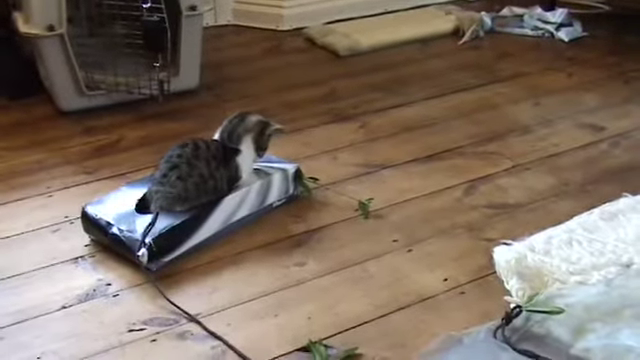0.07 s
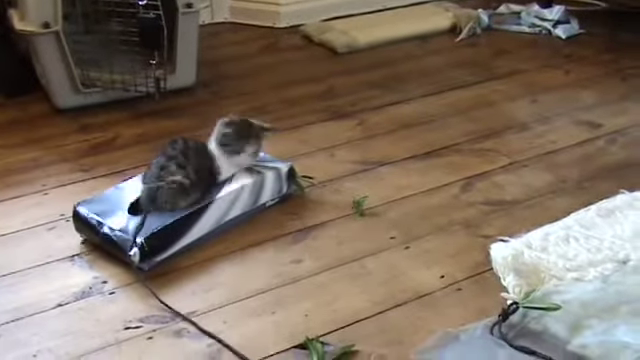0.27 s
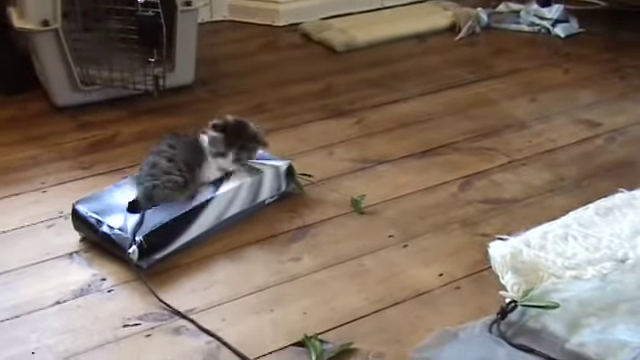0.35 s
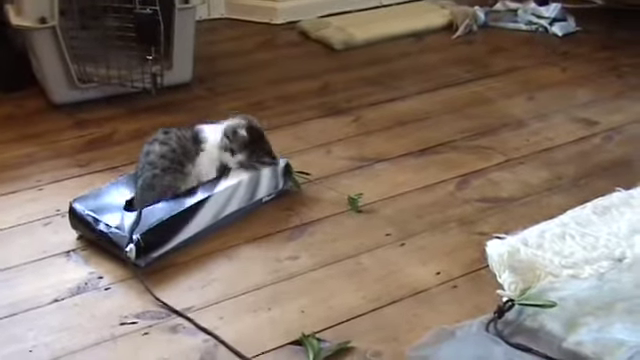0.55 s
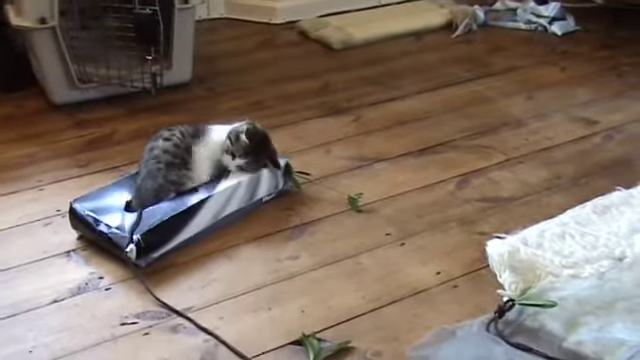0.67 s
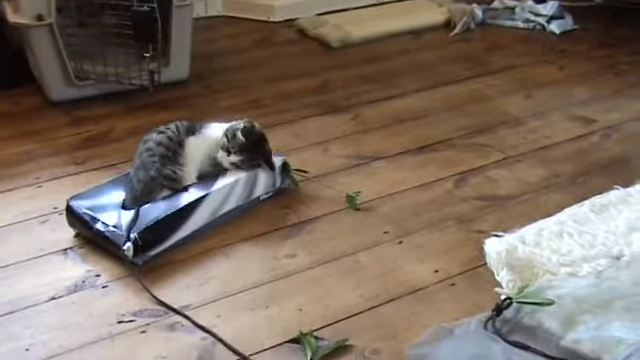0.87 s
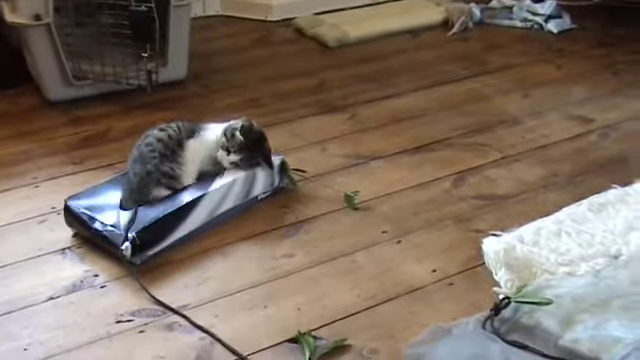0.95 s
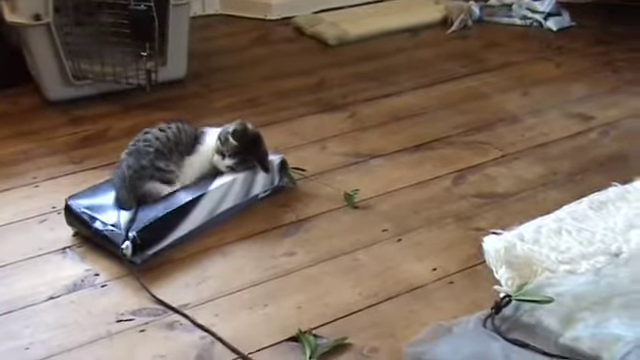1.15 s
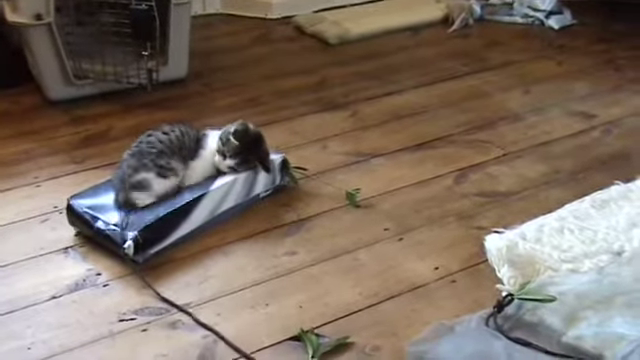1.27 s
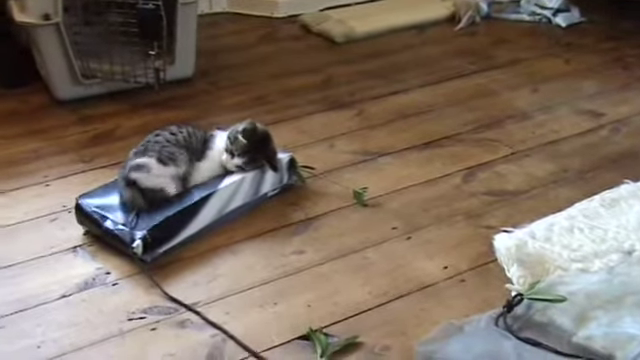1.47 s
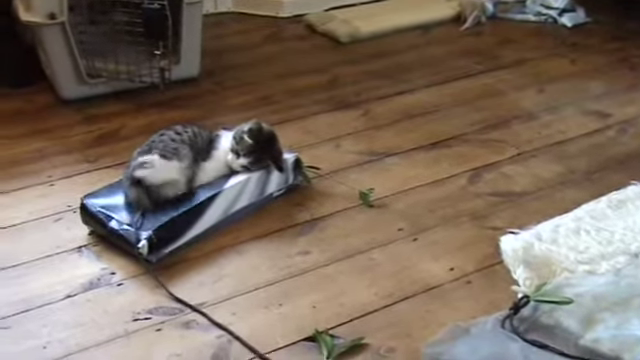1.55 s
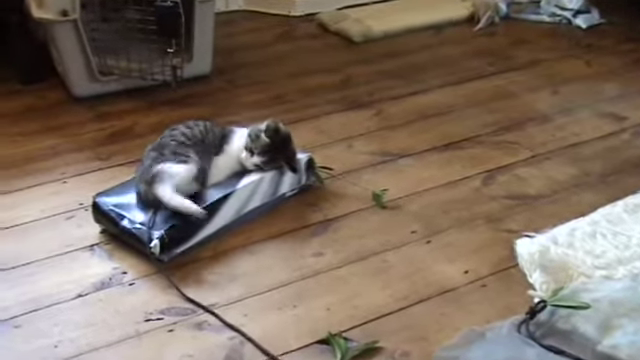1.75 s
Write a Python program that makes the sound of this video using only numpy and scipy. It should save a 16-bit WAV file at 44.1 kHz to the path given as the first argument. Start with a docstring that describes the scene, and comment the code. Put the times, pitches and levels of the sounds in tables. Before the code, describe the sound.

A kitten lands on a wrapped box: a quick hollow thump, paper crackle, then sparse knocks and rustles

```python
"""A kitten pounces on a flat, paper-wrapped box that lies on a wooden floor.
The box thumps and knocks as filtered bursts of dying tones, and booms once after the pounce.
The wrapping rustles as clumps of tiny clicks and snaps as single-cycle clicks, one of them very sharp.
The floorboards give low thuds. A bare, lively room of dense reflections answers the knocks, snaps
and rustle, over a faint steady hush."""
import sys
import numpy as np
from scipy import signal
from scipy.fft import rfft, irfft
from scipy.io import wavfile
from scipy.ndimage import uniform_filter1d

SR = 44100
rng = np.random.default_rng(int(sys.argv[2]) if len(sys.argv) > 2 else 0)


def dump(signal):
    """Clip the signal to [-1, 1] and save it as 16-bit WAV at the path in sys.argv[1]."""
    limited = np.clip(np.atleast_2d(signal).T, -1, 1)
    pcm = np.round(limited * 32767).astype(np.int16)
    wavfile.write(sys.argv[1], SR, pcm)


N = 79380  # samples, 1.8 s


def amp(db):
    """Decibels to gain."""
    return 10 ** (np.asarray(db) / 20)


def unit(x):
    """Scales to rms 1."""
    return x / np.sqrt(np.mean(x ** 2) + 1e-20)


def read(points, hz):
    """Reads a table on a log-frequency axis."""
    f, value = np.transpose(points)
    return np.interp(np.log(hz + 1), np.log(f + 1), value)


def add(mix, s, sound):
    """Mixes a sound in at a time in seconds, cut off at the end of the mix."""
    start = max(round(s * SR), 0)
    part = mix[start:][:len(sound)]
    part += sound[:len(part)]


def colour(x, points):
    """Causal minimum-phase filter that follows a (Hz, dB) table."""
    size = 4096
    hz = abs(np.fft.fftfreq(size, 1 / SR))
    log_gain = np.log(amp(read(points, hz)))
    response = np.exp(np.conj(signal.hilbert(log_gain)))
    taps = np.fft.ifft(response).real[:size // 2]
    return signal.fftconvolve(x, taps)[:len(x)]


def stereo(mid, side):
    """Left and right from middle and side."""
    return np.array([mid + side, mid - side])


def ringing(modes):
    """A second of dying tones, each mode with its own pitch, level and decay."""
    t = np.arange(SR) / SR
    return sum(amp(db - 60 * t / t60) * np.cos(2 * np.pi * hz * t) for hz, db, t60 in modes)


# Steady background. Each row: frequency in Hz, relative level in dB per Hz.
HUSH_COLOUR = [(15, -65), (25, -11.5), (274, -7.5), (340, -7), (895, -14), (1270, -12.5), (1710, -19),
               (2490, -20.5), (5880, -26), (15500, -32)]
HUSH_DB, HUSH_SIDE_DB = -58, 5.5  # rms of the middle; side against middle


def hush():
    """Faint steady noise of the room: coloured noise, independent in middle and side."""
    # a second of run-in lets the filter settle
    mid, side = (unit(colour(rng.standard_normal(N + SR), HUSH_COLOUR)[SR:]) for _ in range(2))
    return amp(HUSH_DB) * stereo(mid, amp(HUSH_SIDE_DB) * side)


# How fast the room dies away. Each row: frequency in Hz, t60 in seconds.
ROOM_DECAY = [(100, .5), (300, 0.05), (650, 0.71), (1300, 0.66), (3000, 0.75), (6000, .5), (12000, 1)]
# Colour of the room's answer. Each row: frequency in Hz, level in dB.
ROOM_COLOUR = [(40, -12), (90, -6), (170, -4.5), (260, 3.5), (400, -1.5), (700, -0.5), (1300, -0.5),
               (2500, -4), (5000, -3), (8000, -8.5), (14000, 0)]
ROOM_GAP_S = .0012  # silence before the first reflection
EARLY_DB, EARLY_S = 5.5, 0.037  # extra strength of the early reflections and its time constant


def room_tail():
    """Dense reflections, strongest at first, each band dying at its own speed."""
    t = np.arange(SR) / SR
    after_gap = t > ROOM_GAP_S
    hz, when, bands = signal.stft(rng.choice([-1., 1.], SR), SR, nperseg=256)
    decay = amp(-60 * when / read(ROOM_DECAY, hz)[:, None])
    tail = signal.istft(bands * decay, SR, nperseg=256)[1][:SR]
    tail *= after_gap * (1 + amp(EARLY_DB) * np.exp(-t / EARLY_S))
    # level the bands, so that the room's colour comes from its table
    spectrum = rfft(tail)
    smooth = np.sqrt(uniform_filter1d(abs(spectrum) ** 2, size=140))
    return colour(irfft(spectrum / smooth) * after_gap, ROOM_COLOUR)


# Faint low tones that ring along with the room's answer.
# Each row: frequency in Hz, level in dB before the send's wet gain, t60 in seconds.
ROOM_RESONANCES = [(149, -70, 0.48), (378, -91, 0.24), (434, -68.5, 0.71), (471, -64, 0.33),
                   (560, -62, 0.24), (917, -76, 0.7), (1286, -64, .55)]
# Stereo width, also used by the rustle. Each row: frequency in Hz, gain of the side signal in dB.
SIDE_WIDTH = [(40, -7), (150, -22), (500, -16.5), (1100, -10.5), (2200, -11), (4500, -7.5), (7500, -4),
              (9500, 3.5), (11000, -14.5), (15000, -35)]


def in_room(x, wet_db):
    """The direct sound in the middle and the room's answer in both channels."""
    mid_tail = room_tail() + ringing(ROOM_RESONANCES)
    side_tail = room_tail()
    mid, side = (amp(wet_db) * signal.fftconvolve(x, tail)[:N] for tail in (mid_tail, side_tail))
    return stereo(x + mid, colour(side, SIDE_WIDTH))


GRAINS_PER_S, GRAIN_SPREAD_DB = 9900, 2  # mean click rate; unevenness of click size
CLUMP_DB, CLUMP_S = 2, 0.007  # how strongly the clumps swing, and for how long


def grains(force, spectrum):
    """Tiny stick-slip clicks of uneven size, clumped band by band, under the force of the strokes."""
    sizes = amp(GRAIN_SPREAD_DB * np.minimum(rng.exponential(1, N), 4)) * rng.choice([-1., 1.], N)
    struck = rng.random(N) < GRAINS_PER_S / SR
    bands = signal.stft(sizes * struck, nperseg=128)[2]
    keep = np.exp(-64 / (SR * CLUMP_S))  # memory from one 64-sample frame to the next
    # neighbouring bands clump partly together
    swings = uniform_filter1d(rng.standard_normal(bands.shape), size=5, axis=0)
    clumps = unit(signal.lfilter([1], [1, -keep], swings))
    clicks = signal.istft(bands * amp(CLUMP_DB * clumps), nperseg=128)[1][:N]
    return force * unit(colour(clicks, spectrum))


# Paws and fur sliding on the wrapping. Each row: peak in seconds, rise in seconds, fall in seconds,
# level of the paper's hiss in dB, level of the box's rumble in dB.
SLIDING_STROKES = [(0.151, 0.028, .02, -58, -54.5), (0.187, 0.014, 0.027, -36.5, -39),
                   (0.228, 0.015, 0.0096, -30, -28), (.268, 0.0097, 0.013, -30, -24.5),
                   (0.314, 0.016, 0.049, -40.5, -29), (0.371, 0.0055, .015, -42, -31.5),
                   (.440, 0.0064, 0.015, -46, -30.5), (.470, 0.0097, 0.079, -52, -46.5),
                   (0.596, 0.027, 0.038, -45, -51.5), (0.63, 0.014, 0.018, -43.5, -43.5),
                   (.700, .04, 0.05, -48.5, -49), (0.749, 0.015, 0.044, -47, -44.5),
                   (.908, 0.042, 0.018, -46.5, -41), (1.142, 0.027, 0.062, -47.5, -38),
                   (1.215, 0.019, 0.021, -43, -49), (1.259, 0.02, 0.035, -44.5, -47.5),
                   (1.324, 0.032, 0.034, -61, -39), (1.706, 0.028, 0.042, -54, -52.5),
                   (1.775, .03, 0.021, -61, -58)]
# Colour of the hissing paper. Each row: frequency in Hz, relative level in dB per Hz.
PAPER_COLOUR = [(200, -17), (800, -8), (1500, -3.5), (2600, 5), (3800, -0.5), (5200, 1), (7200, 2),
                (8500, -6), (11000, -14.5), (15500, -32)]
# Colour of the box rumbling under it. Each row: frequency in Hz, relative level in dB per Hz.
RUMBLE_COLOUR = [(30, -27.5), (90, -10.5), (160, -1), (260, -7), (400, 2), (650, -0.5), (850, -5.5),
                 (1300, -7), (2000, -12.5), (5000, -53.5)]
RUSTLE_SIDE_DB, RUSTLE_ROOM_DB = -3, 0


def rustle():
    """Each stroke swells and fades: the paper hisses and the box under it rumbles."""
    t = np.arange(N) / SR
    hiss_power, rumble_power = 0, 0
    for s, rise, fall, hiss_db, rumble_db in SLIDING_STROKES:
        shape = np.exp(-abs((t - s) / np.where(t < s, rise, fall)) ** 2.06)
        hiss_power = hiss_power + shape * amp(hiss_db) ** 2
        rumble_power = rumble_power + shape * amp(rumble_db) ** 2
    hiss_force = np.sqrt(hiss_power)
    mid = grains(hiss_force, PAPER_COLOUR) + grains(np.sqrt(rumble_power), RUMBLE_COLOUR)
    side = amp(RUSTLE_SIDE_DB) * colour(grains(hiss_force, PAPER_COLOUR), SIDE_WIDTH)
    return in_room(mid, RUSTLE_ROOM_DB) + stereo(0, side)


# Creases of the wrapping snapping over. Each row: start in seconds, level in dB before the tone filter,
# centre in Hz, crackle after the click in dB above half strength.
CREASE_SNAPS = [(.1725, -38, 4300, 6), (0.213, -16, 2500, -19), (0.2207, -19.5, 5860, 5.5),
                (.2409, -14.5, 2730, -28), (.2575, -9.5, 2530, -2.5), (0.2736, -20, 2860, 3.5),
                (0.278, -15.5, 2710, -1.5), (0.285, -23, 4160, -4.5), (0.311, -21.5, 2250, 0),
                (0.33, -9.5, 1720, -16.5), (.3680, -23, 2620, 0.5), (0.4373, -26, 4050, -2),
                (.8413, -17.5, 3260, -6), (0.9348, -1.5, 4080, -7), (.9435, -16, 1360, -5),
                (1.1046, -19.5, 3420, -9), (1.1416, -33, 2920, 6), (1.2866, -16, 4260, -5),
                (1.6972, -27.5, 4070, -9.5)]
# What the taut wrapping rings with after a snap.
# Each row: frequency in Hz, level in dB against the snap's own level, t60 in seconds.
SHEET_MODES = [(590, -48, 0.26), (660, -40.5, 0.75), (1110, -38.5, 0.23), (1225, -31, .3),
               (1877, -38, 0.16), (3740, -36.5, 0.15), (4653, -36.5, .22), (4888, -39.5, 0.23)]
# Tone filter over all the snaps. Each row: frequency in Hz, gain in dB.
SNAP_TONE = [(20, -25.5), (200, -16.5), (550, 4), (1200, -3), (1700, 1.5), (3000, -1), (5000, 0.5),
             (7000, 0), (8300, -1.5), (12000, -12.5), (16000, -23)]
SNAP_CYCLES, CRACKLE_S = 0.36, 0.0024  # length scale of the click in cycles; crackle's time constant
SNAP_ROOM_DB = 4.5


def snaps():
    """A buckling crease gives a click of barely one cycle, then the sheet crackles and rings for a moment."""
    t, out = np.arange(SR) / SR, np.zeros(N)
    ring = ringing(SHEET_MODES)
    for s, db, hz, crackle_db in CREASE_SNAPS:
        age = t * hz / SNAP_CYCLES
        click = 2 * age * np.exp(1 - 2 * age) * np.sin(2 * np.pi * hz * t)
        # the crackle is noise with the colour of the click
        noise = signal.fftconvolve(rng.standard_normal(len(t)), click)[:len(t)]
        crackle = .5 * amp(crackle_db) * unit(noise) * np.exp(-t / CRACKLE_S)
        add(out, s, amp(db) * (click + crackle + ring))
    return in_room(colour(out, SNAP_TONE), SNAP_ROOM_DB)


# Knocks of the box, by paws or by the jolt of the sharp snap.
# Each row: start in seconds, level in dB before filtering, dull above this many Hz, thin below this many Hz.
BOX_KNOCKS = [(0.2143, -2, 604, 200), (0.2416, 18.5, 390, 186), (0.2475, 10, 390, 198),
              (.2585, -1, 680, 148), (.2800, 0, 400, 121), (.3297, -3.5, 1950, 614),
              (0.4357, -18, 2040, 700), (0.58, -14.5, 1200, 402), (0.7386, -19, 770, 348),
              (0.8414, 2, 1480, 256), (0.9351, -9.5, 1200, 195), (1.1047, -5.5, 1300, 158),
              (1.1405, -9.5, 1270, 298), (1.1602, -9, 610, 150), (1.2790, -4.5, 890, 226),
              (1.2865, -20.5, 1680, 400), (1.7080, -20.5, 690, 150), (1.7176, -12.5, 485, 140),
              (1.7410, -24.5, 915, 130), (1.767, -15, 300, 160)]
# What the box rings with. Each row: frequency in Hz, relative level in dB, t60 in seconds.
BOX_MODES = [(142.5, -20.5, 0.26), (235, -15, 0.083), (353.7, -7.5, 0.11), (469, -15.5, 0.15),
             (474.4, -10.5, 0.069), (543.6, -1, 0.025), (674, -22.5, 0.11), (796, -38.5, .03),
             (967, -5, 0.051), (1245, 3, 0.014), (1297, -17.5, 0.032), (2230, 10.5, 0.0067)]
# The lid's own quick flex under a knock: pitch, level relative to the box modes, time constant
SLAP_HZ, SLAP_DB, SLAP_S = 730, 3, 0.00099
KNOCK_ROOM_DB = -1


def knocks():
    """Each knock flexes the lid and rings the box; each blow has its own dullness and thinness."""
    t, out = np.arange(SR) / SR, np.zeros(N)
    slap = amp(SLAP_DB) * np.exp(-t / SLAP_S) * np.cos(2 * np.pi * SLAP_HZ * t)
    ring = ringing(BOX_MODES) + slap
    ring /= ring[0]
    for s, db, dull_hz, thin_hz in BOX_KNOCKS:
        dulled = signal.lfilter(*signal.butter(2, dull_hz, fs=SR), ring)
        blow = signal.lfilter(*signal.butter(2, thin_hz, "high", fs=SR), dulled)
        add(out, s, amp(db) * blow)
    return in_room(out, KNOCK_ROOM_DB)


HUM_START_S, HUM_RISE_S, HUM_T60_S = .258, 0.036, 0.25
HUM_DB, HUM_HZ = -18, 375.4  # peak level and pitch


def hollow():
    """The hollow box booms once after the pounce: one low resonance swells and dies away."""
    t = np.maximum(np.arange(N) / SR - HUM_START_S, 0)
    shape = (1 - np.exp(-(t / HUM_RISE_S) ** 2)) * amp(-60 * t / HUM_T60_S)
    return amp(HUM_DB) * shape / shape.max() * np.sin(2 * np.pi * HUM_HZ * t)


# The floorboards give under the kitten's weight.
# Each row: start in seconds, level in dB before the soft rise and decay.
BOARD_THUDS = [(.272, -23.5), (1.150, -55), (1.325, -63), (1.717, -38)]
BOARD_HZ, BOARD_T60_S, BOARD_RISE_S = 95, 0.083, 0.019


def boards():
    """A short, deep thud of the floor under each shift of weight: a softly rising, dying low tone."""
    t, out = np.arange(SR // 3) / SR, np.zeros(N)
    rise = 1 - np.exp(-t / BOARD_RISE_S)
    tone = rise * np.sin(2 * np.pi * BOARD_HZ * t)
    for s, db in BOARD_THUDS:
        add(out, s, amp(db - 60 * t / BOARD_T60_S) * tone)
    return out


def scene():
    """Box, floor, wrapping and room together."""
    return knocks() + hollow() + boards() + snaps() + rustle() + hush()


SIDE_EDGE_HZ, EDGE_HZ = 10300, 15750  # low-pass corners of the side and of both channels


def record(dry):
    """Narrows the side signal above SIDE_EDGE_HZ, then low-passes both channels at EDGE_HZ."""
    side = signal.fftconvolve((dry[0] - dry[1]) / 2, signal.firwin(31, SIDE_EDGE_HZ, fs=SR), "same")
    both = stereo(dry.mean(0), side)
    band_limit = signal.firwin(511, EDGE_HZ, window=("kaiser", 9), fs=SR)
    return signal.oaconvolve(both, band_limit[None], "same")


dry = scene()
out = record(dry)
dump(out)
```